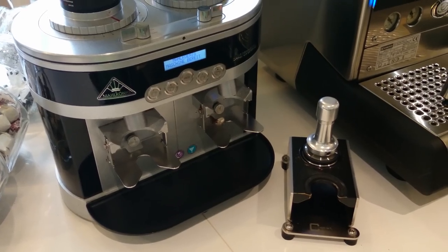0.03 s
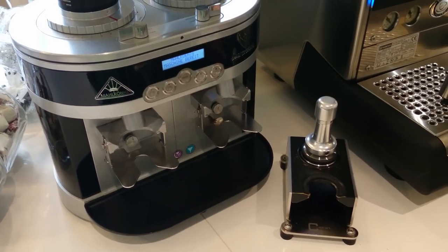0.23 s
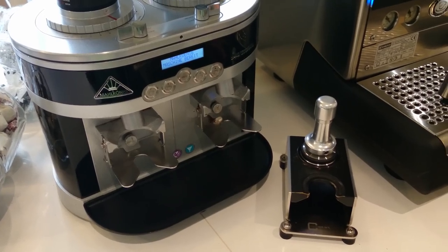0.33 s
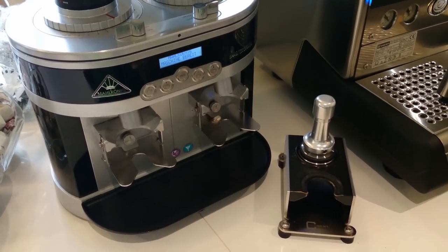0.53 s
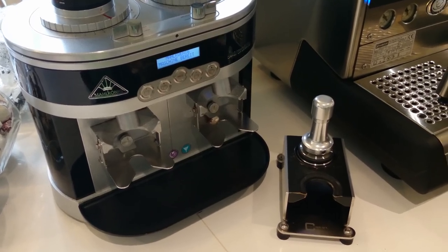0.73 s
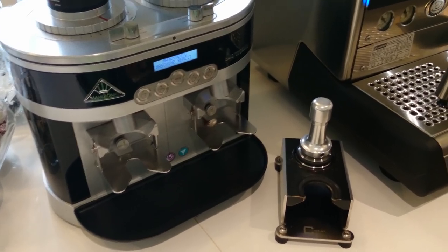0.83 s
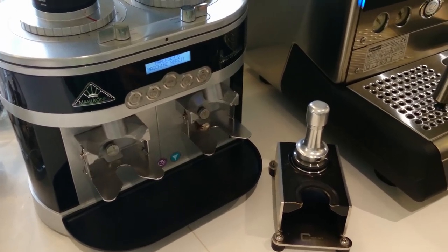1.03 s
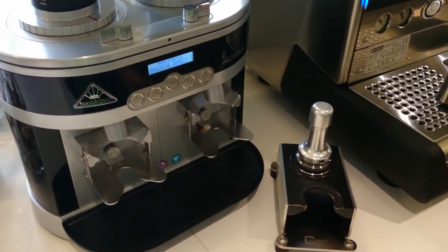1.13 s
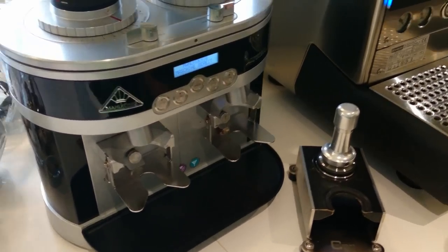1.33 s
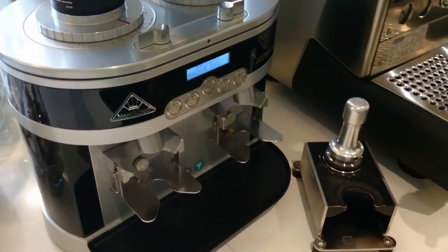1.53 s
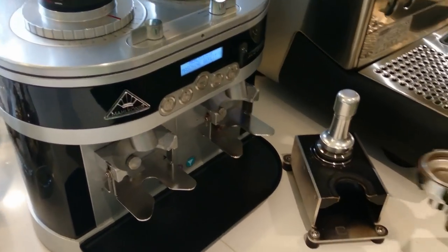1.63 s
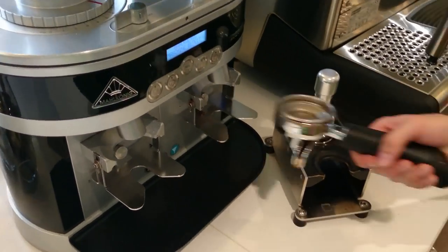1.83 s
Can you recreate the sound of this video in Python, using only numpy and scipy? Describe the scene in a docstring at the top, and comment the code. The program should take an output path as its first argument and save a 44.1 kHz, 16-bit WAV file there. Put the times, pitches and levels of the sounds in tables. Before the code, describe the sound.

A steel portafilter is knocked twice on a knock box at a cafe counter, close up. The first blow is harder and slightly distorted. Between the ringing knocks, metal ticks and slides softly, while motors and fans hum.

```python
"""At a cafe counter, a steel portafilter is knocked twice on a knock box, close up in stereo.
Each blow cracks, clashes the metalware, rings counter and steel and leaves the room booming.
The harder first blow adds a thud and a clank and overloads the microphones.
Between the blows metal ticks, slides and catches, with soft bumps on the counter.
Cooling motors hum over fan noise throughout."""
import sys
import numpy as np
from scipy import signal
from scipy.fft import rfft, irfft
from scipy.io import wavfile
from scipy.ndimage import uniform_filter1d

SR = 44100
rng = np.random.default_rng(int(sys.argv[2]) if len(sys.argv) > 2 else 0)


def master_out(mix):
    """Clip the mix to full scale and print it as 16-bit PCM to the path in sys.argv[1]."""
    frames = np.transpose(np.atleast_2d(mix))
    ceiling = np.clip(frames, -1, 1)
    pcm = np.round(ceiling * 32767).astype(np.int16)
    wavfile.write(sys.argv[1], SR, pcm)


N = 83790
T = np.arange(N) / SR
HZ = np.maximum(np.fft.rfftfreq(N, 1 / SR), 1)
CUTOFF_HZ = 16000


def from_db(db):
    """Decibels to gain."""
    return 10 ** (np.asarray(db) / 20)


def unit_rms(x):
    """Scale to rms 1."""
    return x / np.sqrt(np.mean(x ** 2) + 1e-20)


def at_hz(table, hz):
    """Interpolate on a log-frequency axis."""
    freqs, values = np.transpose(table)
    return np.interp(np.log(hz), np.log(freqs), values)


def level(table):
    """Gain curve from (time [s], level [dB]) rows."""
    return from_db(np.interp(T, *np.transpose(table)))


def drift(rate_hz):
    """Low-passed random wander, rms 1."""
    return unit_rms(irfft(rfft(rng.standard_normal(N)) / (1 + (HZ / rate_hz) ** 2), N))


def swell(start_s, tau_s):
    """Exponential rise, 0 to 1."""
    return 1 - np.exp(-np.maximum(T - start_s, 0) / tau_s)


def decay(start_s, t60_s, hold_s=0):
    """0.5 ms attack, hold, exponential release."""
    attack = np.clip((T - start_s) * 2000, 0, 1)
    return attack * np.exp(-np.log(1000) * np.maximum(T - start_s - hold_s, 0) / t60_s)


def mic_lag_rad(hz, bass_skew_hz=71, right_early_s=0.00015):
    """Phase lag per channel: right hears first, left leads in the bass."""
    right_lag = np.arctan(bass_skew_hz / hz) - 2 * np.pi * hz * right_early_s
    return right_lag * np.array([[0], [1]])


# Microphone balance: (frequency [Hz], left minus right [dB])
MIC_BALANCE = [(40, -2), (150, -4.5), (700, -0.5), (1500, -2.5), (3000, 1), (4600, 8.5), (7000, -2),
               (10000, 8.5), (14000, -4.5)]
def mic_gains(hz):
    """Left and right gain, constant power."""
    pair = from_db(np.array([[1], [-1]]) * at_hz(MIC_BALANCE, hz) / 2)
    return pair / np.sqrt(np.mean(pair ** 2, axis=0))


# Left-right likeness, clipped to a correlation: (frequency [Hz], likeness [ratio])
MIC_LIKENESS = [(40, -1), (200, 1.6), (400, 0.36), (750, 0.5), (1500, -0.19), (3000, -0.0545), (6000, 0)]
def noise(colour, peaks=()):
    """Coloured noise with resonances at both microphones, rms 1."""
    mid, side = rfft(rng.standard_normal((2, N)))
    correlation = np.clip(at_hz(MIC_LIKENESS, HZ), -0.99, 0.99)
    pair = np.sqrt(1 + correlation) * mid + np.sqrt(1 - correlation) * side * [[1], [-1]]
    lift_db = sum(db / (1 + (2 * (HZ - hz) / width_hz) ** 2) for hz, width_hz, db in peaks)
    shape = from_db(at_hz(colour, HZ) + lift_db) * (HZ > 20) * (HZ < CUTOFF_HZ)
    return unit_rms(irfft(pair * np.exp(-1j * mic_lag_rad(HZ)) * mic_gains(HZ) * shape, N))


# Fan spectrum: (frequency [Hz], relative density [dB])
FAN_COLOUR = [(25, -18), (60, 4.5), (140, -11.5), (240, 0.5), (400, -7.5), (750, -18), (1200, -19.5),
              (2800, -27), (4600, -23.5), (7000, -40.5), (11000, -38.5), (15500, -44)]
# Room resonances: (frequency [Hz], width [Hz], lift [dB])
FAN_PEAKS = [(244, 26, 5), (735, 146, 9.5), (1553, 55, 9.5)]
# Fan envelope: (time [s], level [dB])
FAN_LEVEL = [(0, -35.5), (0.7, -33.5), (0.88, -41.5), (1.9, -41)]
def fans():
    """Air noise through room resonances."""
    return level(FAN_LEVEL) * noise(FAN_COLOUR, FAN_PEAKS)


# Motor lines: (frequency [Hz], base rms level [dB])
HUM_LINES = [(100, -33), (150, -48.5), (231, -48)]
# Hum envelope: (time [s], gain [dB])
HUM_GAIN = [(0, 1.5), (0.18, -1.5), (0.42, 5), (0.72, -1.5), (0.9, -4), (1.08, -5.5), (1.2, -1), (1.9, -1)]
def motors():
    """Fixed-pitch hum that swells and sags."""
    hum = sum(from_db(db) * mic_gains(hz) * np.sin(2 * np.pi * hz * T - mic_lag_rad(hz))
              for hz, db in HUM_LINES)
    return np.sqrt(2) * level(HUM_GAIN) * hum


# Metal contact spectrum: (frequency [Hz], relative density [dB])
CONTACT_COLOUR = [(300, 6), (1500, -10.5), (4500, 3.5), (7000, -5), (10000, -6.5), (15500, -7)]
# Contacts within the blows: (time [s], level [dB])
CRACKS = [(0.2191, -12.5), (0.229, -9.5), (0.2443, -9), (0.25, -10.5), (1.5422, -10.5)]
def cracks():
    """Hard metal contacts, one noise burst each."""
    bursts = sum(from_db(db) * decay(start_s, t60_s=0.0124, hold_s=0.0062) for start_s, db in CRACKS)
    return noise(CONTACT_COLOUR) * bursts


def ring(start_s, hz, t60_s, db, build_cycles=1.77):
    """One struck mode: a sine that builds and decays."""
    phase = 2 * np.pi * hz * (T - start_s) - mic_lag_rad(hz)
    envelope = swell(start_s, build_cycles / hz) * decay(start_s, t60_s)
    return from_db(db) * mic_gains(hz) * envelope * np.sin(phase)


# Portafilter blows on the knock box: (time [s], clash gain [dB], clash T60 scale [ratio])
BLOWS = [(0.22, -1.5, 0.88), (1.5418, -9.5, 0.87)]
def heavy_contact(clank_hz=1260, half_width_hz=155):
    """First blow: damped low thud plus hollow band-noise clank."""
    start_s = BLOWS[0][0]
    thud = ring(start_s, hz=305, t60_s=0.031, db=15)
    resonance = 1 / (1 + ((HZ - clank_hz) / half_width_hz) ** 2)
    clank = unit_rms(irfft(rfft(noise(CONTACT_COLOUR)) * resonance, N))
    return thud + from_db(-3) * clank * decay(start_s, t60_s=0.045)


def steel_resonances(x, ripple_db=1.5, width_hz=76, above_hz=2200):
    """Many small metalware resonances as random treble ripple."""
    ripple = unit_rms(uniform_filter1d(rng.standard_normal(len(HZ)), int(width_hz * N / SR)))
    gain = unit_rms(from_db(ripple_db * ripple))
    return irfft(rfft(x) * np.where(HZ > above_hz, gain, 1), N)


# Clash spectra, one list per blow: (frequency [Hz], relative density [dB])
CLASH_SPECTRA = [
    [(35, -23), (100, -10), (200, -4), (330, 0), (600, -10.5), (1300, -12), (2900, -15.5), (4100, -9),
     (5100, -11.5), (7000, -23), (11000, -23.5), (15500, -31.5)],
    [(35, -12), (70, -9), (200, 0.5), (330, -3.5), (600, -9.5), (1300, -13), (2900, -14), (4200, -7),
     (5100, -10.5), (7000, -22.5), (11000, -22.5), (15500, -31.5)],
]
# Metalware decay: (frequency [Hz], base T60 [s])
CLASH_DECAY = [(60, 1), (300, 0.5), (1200, 0.41), (4500, 0.39), (14000, 0.38)]
def clashes(tail_db=-18, tail_cut_hz=12400):
    """Dense metalware modes die band by band; the room adds a duller tail."""
    edges_hz = [0, 140, 560, 1200, 2800, 6000, 10000, SR / 2]
    out = 0
    for (start_s, db, t60_scale), colour in zip(BLOWS, CLASH_SPECTRA):
        spectrum = rfft(steel_resonances(noise(colour)))
        attack = from_db(db) * swell(start_s, tau_s=0.008)
        for low, high in zip(edges_hz, edges_hz[1:]):
            hz = (low + high) / 2
            band = irfft(spectrum * (HZ >= low) * (HZ < high), N)
            direct = decay(start_s, t60_scale * at_hz(CLASH_DECAY, hz), hold_s=0.014)
            tail = from_db(tail_db) * decay(start_s, t60_s=1) / np.hypot(1, hz / tail_cut_hz)
            out += band * attack * np.hypot(direct, tail)
    return out


# Boom spectrum: (frequency [Hz], relative density [dB])
BOOM_SPECTRUM = [(25, -10), (55, 21), (110, -23), (180, 15.5), (400, -60)]
def booms():
    """Counter and room boom on after each blow."""
    return from_db(-32) * sum(noise(BOOM_SPECTRUM) * decay(start_s, t60_s=1.8) for start_s, *_ in BLOWS)


# Counter and steel modes: (frequency [Hz], T60 [s], first blow [dB], second blow [dB])
STRUCK_MODES = [(64.4, 0.24, -36, -7.5), (96.4, 0.32, -9.5, -9.5), (210.4, 0.3, -16, -8.5),
                (239.5, 0.56, -10, -20), (289.9, 0.5, -7, -20), (340.3, 0.54, -9, -24),
                (358.5, 0.29, -6.5, -15.5), (427.3, 0.42, -19.5, -60), (490, 0.64, -18, -41),
                (659, 0.4, -15.5, -25.5), (1046, 0.31, -15, -52), (1184, 0.15, -12, -20),
                (1594, 0.31, -13.5, -46), (3820, 0.13, -19, -35), (4365, 0.45, -15, -24),
                (4630, 0.34, -23, -24.5)]
def ringing(waver_db=1.67):
    """Both blows excite the same modes; reflections make the level waver."""
    out = 0
    for hz, t60_s, *levels_db in STRUCK_MODES:
        mode = sum(ring(start_s, hz, t60_s, db) for (start_s, *_), db in zip(BLOWS, levels_db))
        out += mode * from_db(waver_db * drift(rate_hz=14))
    return out


# Metal ticks: (time [s], level [dB])
METAL_TICKS = [(0.549, -35), (0.7302, -33.5)]
def ticks():
    """Light metal contacts, one noise burst each."""
    bursts = sum(from_db(db) * decay(start_s, t60_s=0.017) for start_s, db in METAL_TICKS)
    return noise(CONTACT_COLOUR) * bursts


# Rub envelope: (time [s], level [dB])
RUB_ENVELOPE = [(0.9, -46), (1.15, -40), (1.32, -33.5), (1.39, -43), (1.415, -36.5), (1.55, -35),
                (1.6, -60)]
# Rub spectrum: (frequency [Hz], relative density [dB])
RUB_SPECTRUM = [(120, -25), (280, 2), (480, -17.5), (700, -10), (1300, -23), (2500, -58)]
def rub():
    """Dull friction noise under the rustle."""
    return level(RUB_ENVELOPE) * noise(RUB_SPECTRUM)


# Sliding envelope: (time [s], level [dB])
SLIDE_LEVEL = [(0.93, -52), (0.99, -44.5), (1.055, -37), (1.105, -44), (1.2, -33), (1.24, -35.5),
               (1.3, -42), (1.402, -51), (1.45, -38.5), (1.52, -41), (1.545, -28), (1.6, -60)]
# Scuffs where the metal catches: (time [s], level [dB])
CATCHES = [(0.956, -54), (1.33, -45.5), (1.409, -34.5)]
# Sliding spectrum: (frequency [Hz], relative density [dB])
SLIDE_COLOUR = [(200, 1), (700, -8), (1400, 0), (3000, -6), (4600, 0.5), (7000, -15), (11000, -16.5),
                (15500, -23.5)]
# Sliding-metal resonances: (frequency [Hz], width [Hz], lift [dB])
SLIDE_PEAKS = [(1310, 25, 11.5), (2060, 45, 7.5), (2640, 160, 5), (5560, 68, 0)]
def rustle(grain_db=1):
    """Metal slides and catches: bright, grainy friction noise."""
    scuffs = sum(from_db(db) * decay(start_s, t60_s=0.12) for start_s, db in CATCHES)
    friction = steel_resonances(noise(SLIDE_COLOUR, SLIDE_PEAKS))
    grain = from_db(grain_db * drift(rate_hz=134))
    return (level(SLIDE_LEVEL) + scuffs) * friction * grain


# Counter bumps: (time [s], gain [dB])
COUNTER_BUMPS = [(0.954, -17), (1.329, -13.5)]
def bumps():
    """Soft contacts excite one damped counter mode."""
    return sum(ring(start_s, hz=249.5, t60_s=0.051, db=db) for start_s, db in COUNTER_BUMPS)


def scene():
    """Stereo sum of background, blows and handling."""
    background = fans() + motors()
    blows = cracks() + heavy_contact() + clashes() + booms() + ringing()
    handling = ticks() + rub() + rustle() + bumps()
    return background + blows + handling


def record(dry):
    """Microphone overload as a soft clip, then a steep low-pass."""
    ceiling, knee = 0.72, 6.5
    clipped = dry / (1 + np.abs(dry / ceiling) ** knee) ** (1 / knee)
    lowpass = signal.cheby2(16, 60, CUTOFF_HZ + 600, fs=SR, output="sos")
    return signal.sosfilt(lowpass, clipped)


dry = scene()
out = record(dry)
master_out(out)
```